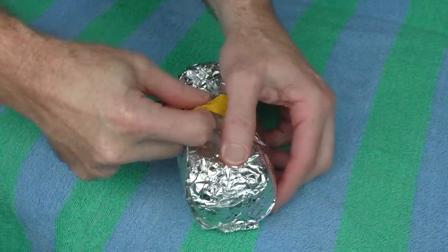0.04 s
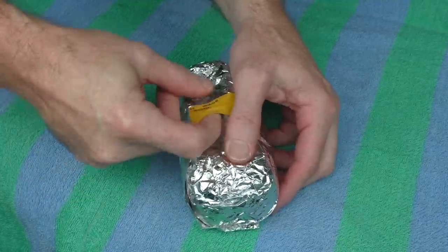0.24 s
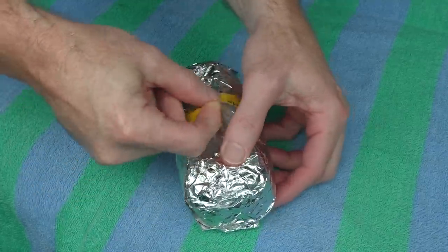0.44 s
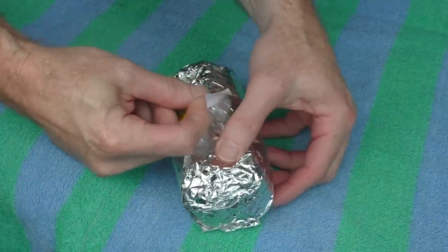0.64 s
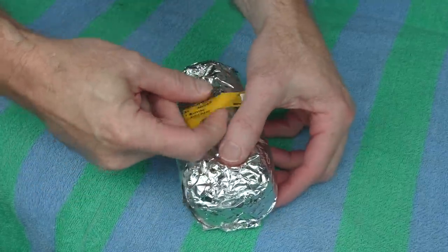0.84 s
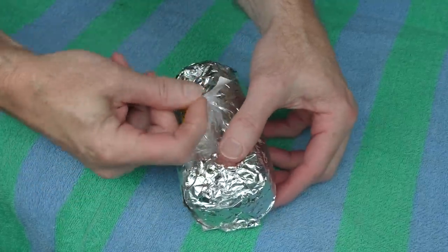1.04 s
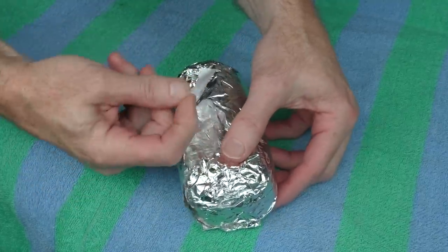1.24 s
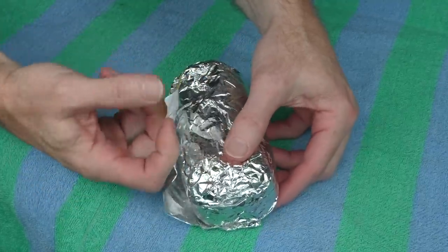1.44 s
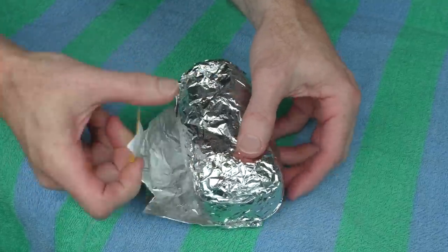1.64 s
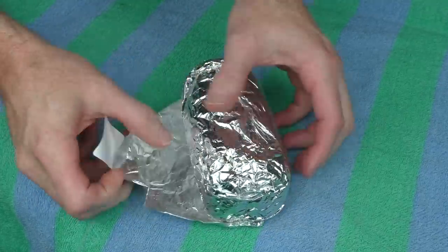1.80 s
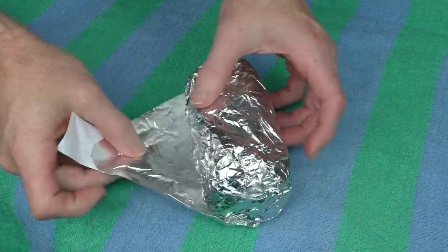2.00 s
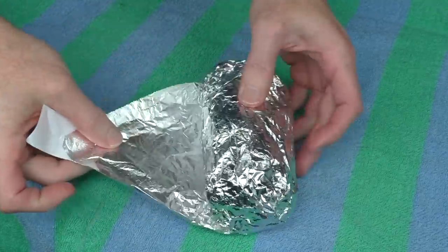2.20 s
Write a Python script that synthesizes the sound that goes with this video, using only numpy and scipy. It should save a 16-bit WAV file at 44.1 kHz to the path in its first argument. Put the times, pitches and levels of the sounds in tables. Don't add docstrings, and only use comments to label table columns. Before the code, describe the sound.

Crisp foil crinkles and snaps, close up, while a wrapped roll is unwrapped by hand

```python
import sys
import numpy as np
from scipy import signal
from scipy.fft import rfft, irfft, next_fast_len
from scipy.io import wavfile
from scipy.ndimage import uniform_filter1d, map_coordinates

SR = 44100
rng = np.random.default_rng(int(sys.argv[2]) if len(sys.argv) > 2 else 0)


def store_pcm(level_fs):
    pcm = np.round(np.clip(level_fs, -1, 1) * 32767).astype(np.int16)
    wavfile.write(sys.argv[1], SR, np.atleast_2d(pcm).T)


def voltage_ratio(level):
    return 10 ** (np.asarray(level, float) / 20)


N = 99621


def unit(x):
    return x / np.sqrt(np.mean(x ** 2) + 1e-20)


def left_right(mid, side):
    return np.array([mid + side, mid - side])


def level_curve_db(points):
    start_s, level_db = np.transpose(points)
    return np.interp(np.arange(N) / SR, start_s, level_db)


def along(points, hz):
    point_hz, value = np.transpose(points)
    return np.interp(np.log(hz + 1), np.log(point_hz + 1), value)


def filtered(x, response):
    m = next_fast_len(N + 8192)
    return irfft(rfft(x, m) * response(np.fft.rfftfreq(m, 1 / SR)), m)[..., :N]


def band(f, hz, width_hz):
    return 1j * f * width_hz / (hz ** 2 - f * f + 1j * f * width_hz)


def resonant(x, peaks):
    def response(f):
        h = sum((-1) ** k * voltage_ratio(db) * band(f, hz, width_hz) for k, (hz, width_hz, db) in enumerate(peaks))
        return h / np.sqrt(np.mean(abs(h) ** 2))
    return filtered(x, response)


# pitch_hz, likeness_0_to_1
LIKENESS = [(30, 1), (300, 0.87), (1200, 0.7), (8000, 0.1)]


def air(gain):
    def response(hz):
        turn_rad = np.arccos(np.clip(along(LIKENESS, hz), -1, 1)) / 2
        return gain(hz) * [np.cos(turn_rad), np.sin(turn_rad)]
    return unit(left_right(*filtered(rng.standard_normal((2, N)), response)))


# pitch_hz, density_db_per_hz
ROOM_TONE = [(20, -23), (45, -6), (90, -2.5), (300, -5.5), (600, -22.5), (850, -8.5), (1200, -11.5),
             (3200, -25)]
# pitch_hz, density_db_per_hz
MIC_HISS = [(4000, 15), (10000, -3), (15500, 7)]
# pitch_hz, width_hz, level_db
HOUSE_HUM = [(42, 36, -57.5), (78.5, 1.9, -55), (172.6, 4.8, -72.5), (334, 3.7, -64.5)]


def room():
    tone = voltage_ratio(-49.5) * air(lambda hz: voltage_ratio(along([(8, -52)] + ROOM_TONE + [(9000, -76)], hz)))
    hiss = voltage_ratio(-62) * air(lambda hz: voltage_ratio(along([(300, -20)] + MIC_HISS, hz)))
    hum = sum(voltage_ratio(db) * air(lambda f: 1 / (1 + (2 * (f - hz) / width_hz) ** 2))
              for hz, width_hz, db in HOUSE_HUM)
    return tone + hiss + hum


def walls(x):
    t60_s, level_db = 0.16, -25.5
    t = np.arange(SR // 3) / SR
    tail = rng.standard_normal((2, len(t))) * voltage_ratio(-60 * t / t60_s)
    return voltage_ratio(level_db) * signal.fftconvolve(x, tail / np.linalg.norm(tail[0]), axes=1)[:, :N]


# start_s, level_db
CLOTH_RUSTLE = [
    (1.3, -66),
    (1.7, -55),
    (2.0, -50.5),
    (2.15, -44),
    (2.26, -59),
]
# pitch_hz, width_hz, level_db
CLOTH_MODES = [(65.4, 25, 7), (186.7, 43, 1)]


def cloth_rumble():
    rumble = resonant(resonant(rng.standard_normal(N), CLOTH_MODES), CLOTH_MODES)
    return voltage_ratio(level_curve_db(CLOTH_RUSTLE)) * unit(rumble)


# pitch_hz, width_hz, level_db
LOW_MODES = [(457, 610, -6.5), (1110, 370, 4), (1563, 149, 6), (1954, 390, 4)]
MIDDLE_MODES = [(2600, 640, 4.5), (3264, 644, 7.5)]
UPPER_MODES = [(4320, 680, -0.72), (6470, 1670, -1.2)]
BRIGHT_MODES = [(8550, 3800, 0.54), (12750, 8300, 1.3), (14850, 2600, 1)]


def foil(low, middle, upper, bright):
    side_db, left_db = (-7.5, -8.5, -15.5, -11.5), 0.5
    bands = zip((low, middle, upper, bright), (LOW_MODES, MIDDLE_MODES, UPPER_MODES, BRIGHT_MODES), side_db)
    mid, side = sum(resonant(x, modes) * voltage_ratio([[0], [db]]) for x, modes, db in bands)
    return left_right(mid, side) * voltage_ratio([[left_db / 2], [-left_db / 2]])


def clicks(level, rate_hz, mix_db):
    spread_db, grain_s, friction = 3.5, 0.0007, 1.3
    unequal_db = spread_db * (rng.exponential(size=N) + rng.standard_normal((4, N)))
    size = (rng.random(N) < rate_hz / SR) * voltage_ratio(unequal_db)
    grains = signal.lfilter([1], [1, -np.exp(-1 / (grain_s * SR))], size)
    shape = unit(abs(grains)) + friction
    noise = rng.standard_normal((4, 2, N))
    return foil(*(voltage_ratio(mix_db)[:, None, None] * level * shape[:, None] * noise))


# start_s, level_db
HANDS = [(0.0, -54), (0.3, -55.5), (0.43, -54.5), (0.55, -57), (0.72, -59), (0.82, -60.5), (1.16, -54),
         (1.36, -55.5), (1.43, -57), (1.5, -55), (1.545, -61.5), (1.7, -52.5), (1.84, -58), (1.91, -52.5),
         (2.17, -46.5), (2.26, -53)]


def rustle():
    level = voltage_ratio(-9 + level_curve_db(HANDS))
    return clicks(level, rate_hz=900, mix_db=(-1.5, -6.5, -7, -3.5))


# start_s, length_s, level_db
TEAR_EVENTS = [(0.189, 0.059, -45), (0.365, 0.039, -46.5), (0.758, 0.1, -51), (0.878, 0.038, -38.5),
               (1, 0.11, -42), (1.213, 0.072, -42.5), (1.46, 0.061, -46.5), (1.573, 0.037, -53.5),
               (1.627, 0.035, -56), (0.548, 0.022, -57), (1.895, 0.029, -41.5), (1.704, 0.076, -59),
               (1.854, 0.46, -51)]


def tearing():
    t = np.arange(N) / SR
    level = 0
    for start_s, length_s, db in TEAR_EVENTS:
        arch = 4 * (t - start_s) * (start_s + length_s - t) / length_s ** 2
        level = level + voltage_ratio(db) * np.sqrt(np.clip(arch, 0, 1))
    return clicks(level, rate_hz=700, mix_db=(-21, -12.5, -11, -8.5))


# start_s, peak_db, pitch_hz
FOLD_SNAPS = [(0.0041, -22.7, 7500), (0.0282, -26.5, 2700), (0.0317, -25.8, 3900), (0.0483, -31.9, 8600),
              (0.0515, -28.3, 10400), (0.0887, -38.4, 11800), (0.1266, -29.7, 9900), (0.3285, -47.7, 3300),
              (0.3403, -45.9, 1600), (0.4567, -43.8, 1600), (0.6689, -33.8, 12700), (0.7309, -40.0, 2800),
              (0.7602, -43.1, 10300), (0.7969, -37.2, 12200), (0.8027, -28.2, 11700),
              (0.8105, -32.0, 11300), (0.8194, -31.3, 11200), (0.8259, -10.8, 13400),
              (0.8266, -12.8, 13700), (0.8312, -13.6, 12500), (0.842, -29.2, 2900), (0.8689, -30.8, 8700),
              (0.9262, -34.9, 9600), (1.0093, -38.0, 11500), (1.0164, -27.2, 3400), (1.0251, -15.2, 6600),
              (1.0507, -23.9, 3100), (1.0659, -23.5, 11400), (1.0789, -26.6, 11300), (1.0865, -23.5, 3200),
              (1.0905, -25.2, 6400), (1.2172, -32.2, 3100), (1.2308, -27.6, 12800), (1.2371, -19.2, 12800),
              (1.2432, -18.6, 11100), (1.2519, -14.3, 9000), (1.2543, -13.4, 7600), (1.2584, -20.0, 6500),
              (1.2852, -23.6, 12300), (1.2876, -5.6, 12200), (1.3145, -25.5, 11500), (1.3294, -2.4, 12200),
              (1.4632, -37.4, 3600), (1.5605, -45.1, 2300), (1.7257, -40.6, 9300), (1.8866, -34.1, 1900),
              (1.9025, -27.2, 2100), (1.9066, -27.4, 8000), (1.9109, -29.5, 6500), (1.9189, -22.4, 8400),
              (1.9755, -34.0, 1500), (1.9983, -25.8, 2800), (2.0015, -17.2, 9700), (2.0051, -23.3, 11100),
              (2.0174, -27.7, 2600), (2.0265, -30.0, 3600), (2.0341, -26.7, 6400), (2.0601, -28.8, 3100),
              (2.0943, -33.4, 1300), (2.1258, -31.1, 3400)]


def ticks():
    cycles, level_db = 1.1, -3
    tail_db, tail_t60_s = -12.5, 0.024
    side_db, lean, lean_spread = -9, 0.45, 0.7
    start_s, peak_db, pitch_hz = np.transpose(FOLD_SNAPS)[..., None]
    count = len(start_s)
    t = np.arange(1024) / SR
    u = t * pitch_hz / cycles

    f = np.fft.rfftfreq(len(t), 1 / SR)
    around_pitch = 1 / (1 + (2 * (f - pitch_hz) / pitch_hz) ** 2)
    rough = irfft(rfft(rng.standard_normal((count, 2, len(t)))) * around_pitch[:, None], len(t))
    rough = rough / rough.std(axis=2, keepdims=True)
    rough = rough * voltage_ratio(tail_db - 60 * t / tail_t60_s) * np.minimum(u, 1)[:, None]

    pan = np.stack([np.ones(count), rng.normal(lean, lean_spread, count)], axis=1)
    snap = u * np.exp(1 - u) * np.sin(2 * np.pi * pitch_hz * t)
    snap = snap[:, None] * pan[..., None]
    sound = voltage_ratio(peak_db + level_db)[:, None] * (snap + rough) * voltage_ratio([[0], [side_db]])

    first = np.round((start_s - cycles / pitch_hz) * SR).astype(int)
    at = (first + np.arange(len(t))).ravel()
    mid, side = (np.bincount(at, sound[:, k].ravel(), N + len(t))[:N] for k in range(2))
    return left_right(mid, side)


# start_s, pitch_hz, level_db
PANEL_POPS = [
    (.366, 990, -29),
    (1.053, 1440, -23.5),
    (1.765, 1536, -28.5),
    (1.871, 1620, -29.5),
    (2.153, 1030, -17),
    (2.184, 1560, -27.5),
]


def pops():
    t60_s, rise_s = 0.022, 0.0006
    start_s, pitch_hz, level_db = np.transpose(PANEL_POPS)[..., None]
    t = np.maximum(np.arange(N) / SR - start_s, 0)
    envelope = voltage_ratio(level_db - 60 * t / t60_s) * (1 - np.exp(-t / rise_s))
    return np.sum(envelope * np.sin(2 * np.pi * pitch_hz * t), axis=0)


# start_s, bright_peak_db, then low_db, middle_db,
# upper_db against that peak
CREASE_EVENTS = [(0.0, -30, -8, 5, 4), (0.0074, -26, -27, -8.5, -10), (0.0253, -33.5, -9, -4.5, -10),
                 (0.0305, -28, -16, -11, -5.5), (0.0506, -29.5, -15, -12.5, -9),
                 (0.105, -42, -8.5, -12, -4), (0.1244, -30, -20, -20, -13), (0.194, -48, -14, -23, -26),
                 (0.204, -31.5, -19, -3.5, -26), (0.3647, -20.5, -12.5, -1.5, -16),
                 (0.3756, -29.5, -10.5, -24, -10), (0.4712, -25, -21, -17, -9.5),
                 (0.528, -25.5, -5, 6.5, 6.5), (0.5582, -46, -22, 9, 2.5), (0.5863, -38.5, -6, -9, -24),
                 (0.6102, -60.5, 1, 8.5, -13), (0.6674, -49, -3, -1.5, -9), (0.7745, -32, -40, -38, -29),
                 (0.8013, -25, -35, -42, -33), (0.8249, -7.5, -27.5, -16, -10),
                 (0.8296, -16, -23, -10, -6.5),
                 (0.8669, -48, -2, 1, -15), (0.8814, -18, -19, -13.5, -8.5), (0.9248, -36, -9, -9, -10),
                   (0.9734, -25.5, -35, -16.5, -19), (1.0187, -12, -22, -7, -25),
                   (1.0199, -24, -11, 11.5, 5.5), (1.0356, -11.5, -21, -2, -4), (1.052, -23.5, -10, 0.5, 1),
                   (1.078, -31, -39, -17, 1.5), (1.087, -27, -30, -19, -7), (1.1524, -43, -4, -3.5, -5),
                   (1.1946, -35, -10, -2.5, -2.5), (1.2363, -16, -29, -11, -11),
                   (1.243, -19.5, -18, -16, -28), (1.2449, -14, -23, -2.5, -4.5),
                   (1.2521, -18.5, -28, -4.5, -18), (1.2863, -14, -14, -5.5, 1.5),
                   (1.3193, -36, -1.5, -8, -4), (1.3283, -3, -21.5, -14.5, -14),
                   (1.4552, -40.5, -7, -26, -11), (1.467, -30.5, -17, -5.5, -8),
                   (1.479, -19, -42, -24, -17.5),
                 (1.5796, -50, 5, -1, -17), (1.625, -32, -23, -13, -9), (1.6855, -24.5, -10, -11, -8.5),
                     (1.6805, -51, 12.5, -10, -8), (1.699, -49, 6, 1, -5), (1.7643, -24.5, -10, -3, -12.5),
                     (1.8683, -22.5, -8.5, -10.5, -11), (1.9007, -38.5, 6.5, -12, -13),
                     (1.913, -13.5, -14.5, -9.5, -5), (1.9322, -25, -18, -4.5, -4),
                     (1.9459, -31.5, -2.5, -7, -5), (1.9656, -41, -3.5, -18, -7),
                     (1.9808, -12, -19, -9.5, -7.5), (1.9998, -20.5, -13, -8.5, -7),
                     (2.016, -30, -7.5, -4.5, -15), (2.0307, -31, -21, -24, -7), (2.0594, -48, 7, 11, -21),
                     (2.064, -28, -4.5, 2.5, -2), (2.071, -26.5, -5, -3.5, -4), (2.0875, -42, 6.5, -7, 1.5),
                     (2.1167, -33, -5, -7, -0.5), (2.1518, -13, -9.5, -8.5, -4.5),
                     (2.182, -48, 4, 7.5, -18)]


def creases():
    crack_s, rise_s, lag_s = 0.00009, 0.0004, 0.0009
    strain_s, strain_db = 0.002, -30
    ring_db, ring_lag = -9, 0.34
    ring_t60_s = np.array([[0.061], [0.056], [0.047], [0.047]])
    kick_db = (15, 12, 8)
    colour_db, lumps_db, lumps_hz = 5.5, 3.5, 1300
    lead = SR // 100
    t = (np.arange(SR // 12) - lead) / SR
    after = np.maximum(t, 0)
    strain = (t < 0) * voltage_ratio(strain_db) * np.exp(np.minimum(t, 0) / strain_s)
    rise = 1 - np.exp(-after / rise_s)
    crack = after / crack_s * np.exp(1 - after / crack_s)
    lump_grid = np.meshgrid(range(4), after * lumps_hz, indexing="ij")
    drive = np.zeros((4, 2, N + 2 * len(t)))
    for start_s, peak_db, low_db, middle_db, upper_db in CREASE_EVENTS:
        noise = rng.standard_normal((4, 2, len(t)))
        knots = rng.standard_normal((4, 100))
        patch = unit(uniform_filter1d(rng.standard_normal(len(t) // 2 + 1), size=12))
        ringing = unit(irfft(rfft(noise) * voltage_ratio(colour_db * patch), len(t)))
        lumps = voltage_ratio(lumps_db * map_coordinates(knots, lump_grid, order=1))
        fall = voltage_ratio(ring_db - ring_lag * (peak_db + 20.5) - 60 * after / ring_t60_s)
        sound = (fall * lumps * rise + strain)[:, None] * ringing
        sound[:3, :, lead] += voltage_ratio(kick_db)[:, None] * np.sign(noise[0, :, 0])
        sound[3] += crack * np.sign(noise[3])
        mix = voltage_ratio(peak_db + np.array([low_db + 1.5, middle_db, upper_db + 0.5, -4.5]))
        first = round((start_s + lag_s) * SR)
        drive[..., first:first + len(t)] += mix[:, None, None] * sound
    return foil(*drive[..., lead:lead + N])


def scene():
    around = room() + cloth_rumble()
    sheet = rustle() + tearing() + ticks() + pops() + creases()
    return sheet + walls(sheet) + around


def band_limit(x):
    return signal.sosfilt(signal.butter(12, 16980, fs=SR, output="sos"), x)


def record(dry):
    def response(hz):
        dip = 1 - 0.82 * band(hz, 855, 480)
        return dip * np.where(hz < 15800, 1, voltage_ratio(-33) * (hz < 16900))
    return band_limit(filtered(dry, response))


dry = scene()
out = record(dry)
store_pcm(out)
```